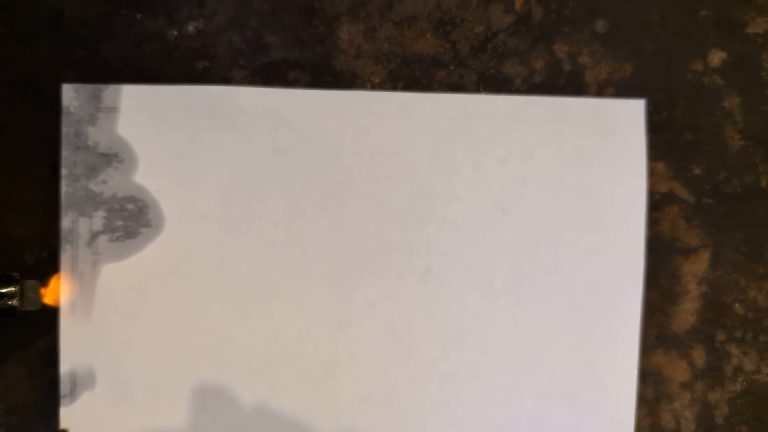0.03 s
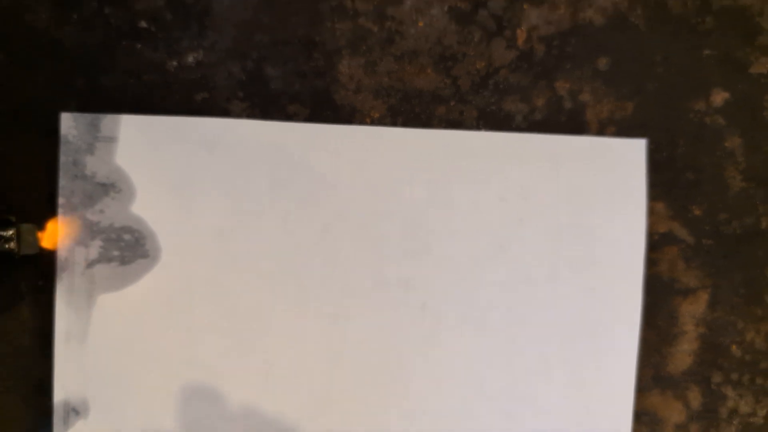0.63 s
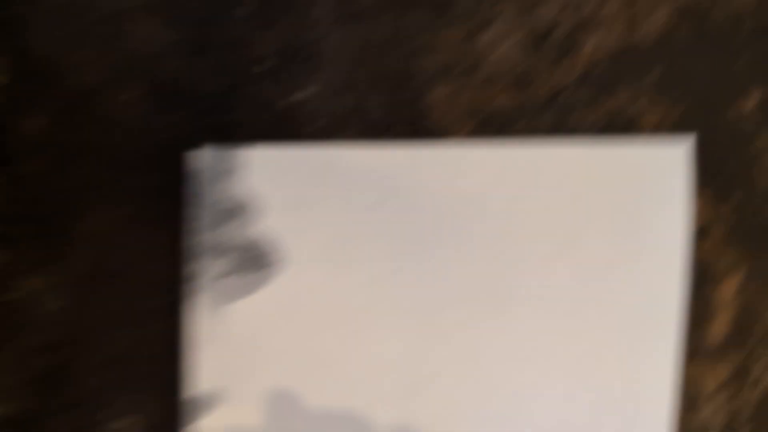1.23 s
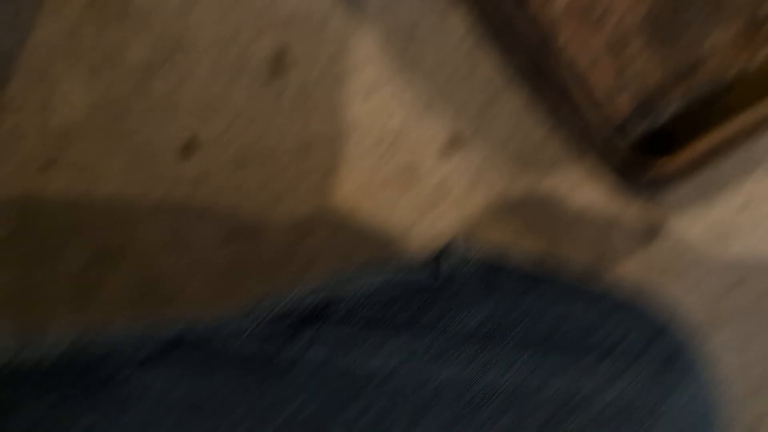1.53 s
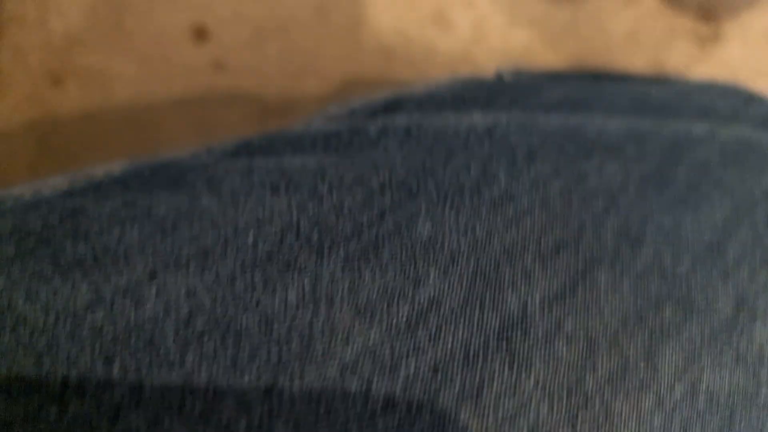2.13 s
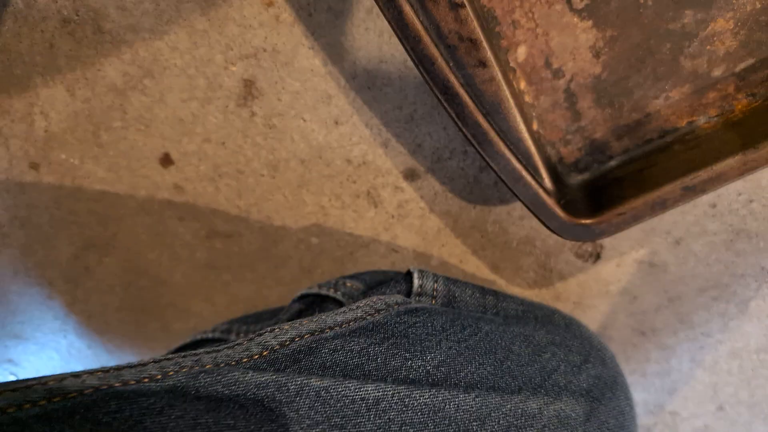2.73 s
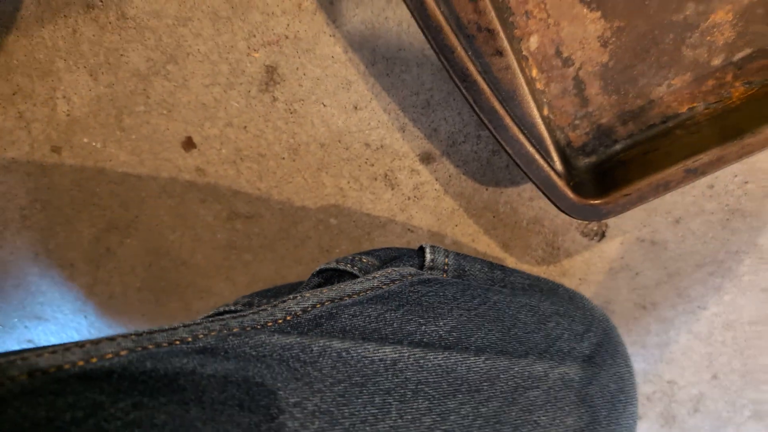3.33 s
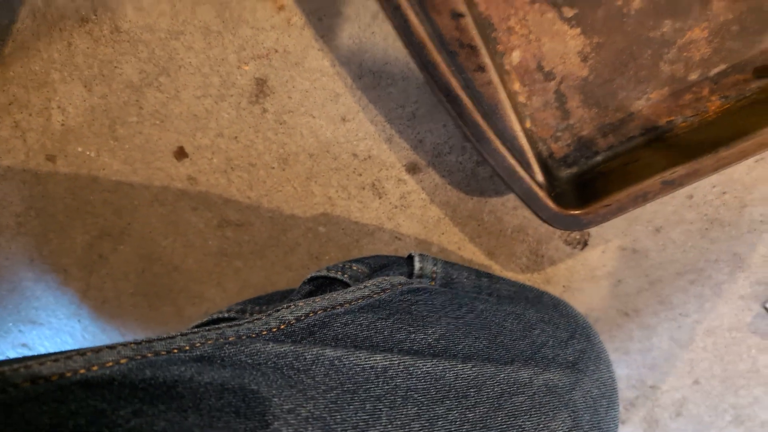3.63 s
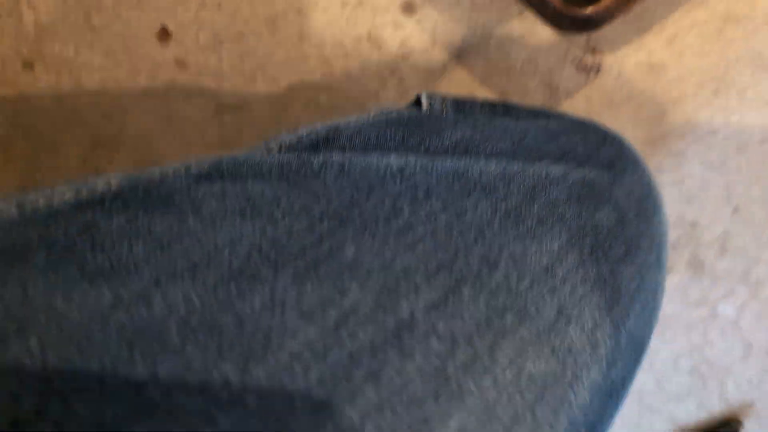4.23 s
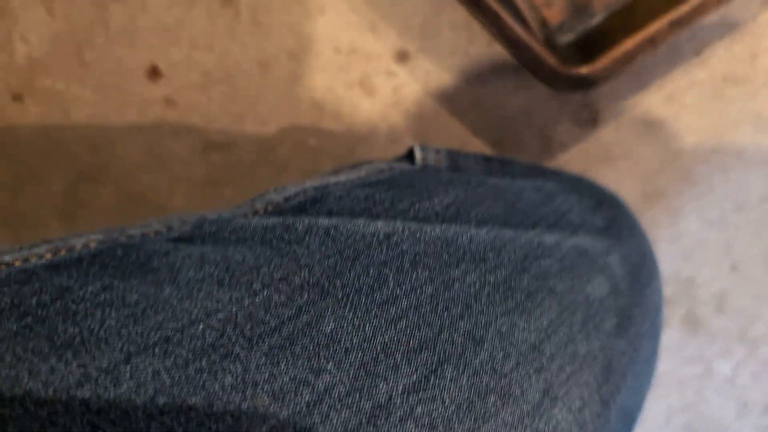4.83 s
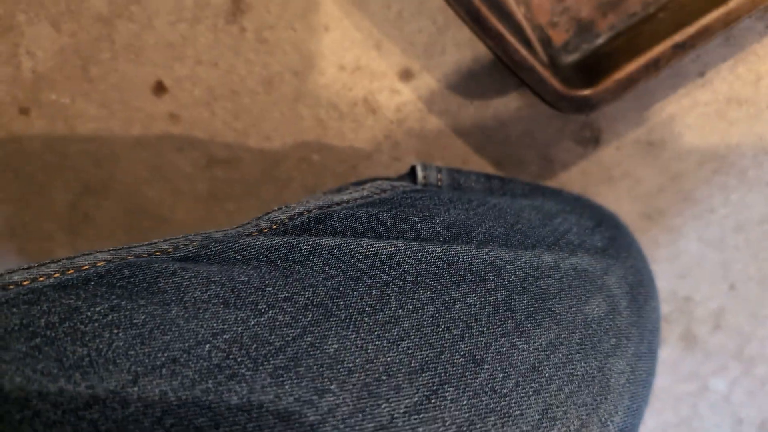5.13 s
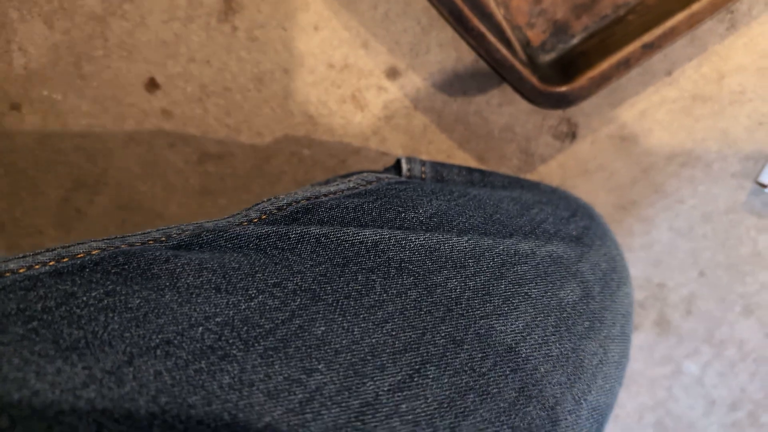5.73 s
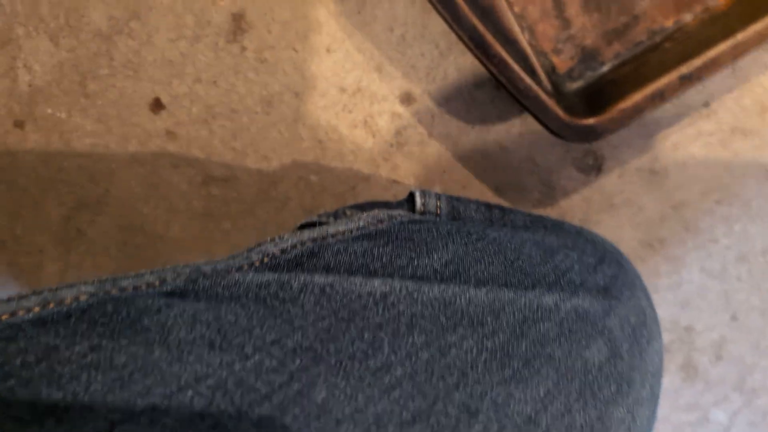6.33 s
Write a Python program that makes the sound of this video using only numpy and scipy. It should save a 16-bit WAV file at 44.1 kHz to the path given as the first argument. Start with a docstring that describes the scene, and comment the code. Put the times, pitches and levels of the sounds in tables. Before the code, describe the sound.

A lighter's flame rushes faintly against paper, then the lever snaps off with a sharp click. A sleeve swishes and the lighter clatters onto the floor. A metal baking tray is dragged over gritty concrete, scraping, catching and ringing lightly. Sharp snaps and dull finger knocks follow right on the microphone, with denim rustling against it and fading. A quiet low rumble fills the small, hard room.

```python
"""A metal baking tray is dragged over gritty concrete: it slips, catches and rings as sand grinds under it.
Before that, a lighter's flame rushes softly at the edge of a sheet of paper, the lever clicks off,
a sleeve swings past and the lighter clatters onto the floor. As the dragging ends, fingers knock and rub
on a hand-held camera and denim rustles against it. A low rumble fills the small, hard room."""
import sys
import numpy as np
from scipy import signal
from scipy.fft import rfft, irfft
from scipy.io import wavfile
from scipy.ndimage import uniform_filter1d

SR = 44100
rng = np.random.default_rng(int(sys.argv[2]) if len(sys.argv) > 2 else 0)


def to_wav(sig):
    """Store sig (one row per channel, or 1-D mono) as 16-bit WAV at the path in sys.argv[1].

    Samples outside -1..1 are clipped; the rate is SR.
    """
    pcm = np.clip(np.atleast_2d(sig), -1, 1) * 32767
    pcm = np.round(pcm).astype(np.int16)
    wavfile.write(sys.argv[1], SR, pcm.T)  # frames by channels


N = 290178
T = np.arange(N) / SR

# Pushes that slide the tray: start_s, length_s, level_db
PUSHES = [(2.565, 0.15, -34.5), (2.72, 0.048, -41), (2.785, 0.05, -30.5), (2.92, 0.13, -41.5),
          (2.99, 0.16, -35.5), (3.14, 0.089, -34), (3.40, 0.15, -47), (3.52, 0.1, -41.5), (3.63, 0.13, -45)]
# The tray catching on the floor: start_s, level_db, treble_db, fade_s, pan_db
# (a fade is the time to drop by 60 dB; a pan above zero is to the left)
CATCHES = [(2.568, -42, -12.5, 0.17, -3), (2.799, -26.5, 0.5, 0.093, 0), (2.82, -24, -8, 0.13, -3),
           (3.278, -28.5, -9, 0.058, -0.5), (3.406, -39.5, -17.5, 0.046, 6), (3.435, -36, -3.5, 0.092, -2)]
# Tone of the scrape, or how strong each pitch is: pitch_hz, level_db
SCRAPE_TONE = [(71, -59), (120, -25.5), (355, -13.5), (418, -23), (580, -8), (773, -8), (1090, -2.5),
               (1290, -7.5), (1400, -8), (2480, -16.5), (2700, -20), (3520, -14), (4590, -22),
               (7200, -28.5), (16000, -44.5)]
# Sand grinding under the rim: start_s, length_s, level_db, pitch_hz
GRINDS = [(2.622, 0.1, -43, 2900), (2.961, 0.067, -46, 2860), (3.12, 0.058, -38.5, 2690),
          (3.268, 0.023, -24.5, 2850), (3.301, 0.029, -25.5, 1860), (3.385, 0.084, -29.5, 1990),
          (3.49, 0.19, -42.5, 2066), (3.618, 0.06, -32.5, 3280)]
# Tone of the sand: pitch_hz, level_db
SAND_TONE = [(71, -48.5), (120, -21), (231, -8.5), (402, -17.5), (546, -8.5), (789, -8), (892, -19.5),
             (1120, -20.5), (1490, -17.5), (1980, -3.5), (2240, -5.5), (4880, -7.5), (6110, -10.5),
             (14700, -17.5), (16000, -27.5)]

def tray():
    """The tray slides and catches on concrete; sand under its rim makes it stick, slip and chatter."""
    slips = unit(friction(per_s=6500, spread_db=-0.5, flutter_db=1.8, lag_ms=-0.11, alike=0.4))
    slips = slips * strokes(PUSHES, rise_share=0.76, fade_s=0.31)
    scrape = unit(colour(slips, SCRAPE_TONE)) * slips.std()
    catches = blows(CATCHES, SCRAPE_TONE, lag_ms=-.5, alike=0.37, rise_ms=2.7, split_hz=2400, tick_db=-17)
    sand = friction(per_s=2800, spread_db=1, flutter_db=3, lag_ms=-0.47, alike=0.12)
    starts, _, _, pitches = np.transpose(GRINDS)
    chatter_hz = pitches[np.maximum(np.searchsorted(starts, T) - 1, 0)]  # each grind has its own pitch
    chatter = amp(-8.5) * unit(resonate(sand, chatter_hz, width_hz=600))
    rasp = (unit(colour(sand, SAND_TONE)) + chatter) * strokes(GRINDS, rise_share=0.66, fade_s=0.074)
    ring = tray_ring(slips + catches, fade_s=.4, ring_db=-2.3)
    return room(bounces(scrape + catches + rasp, echo_db=-1), echo_db=-9.5) + ring


# The notes the tray rings with: pitch_hz, level_db
TRAY_NOTES = [(565.2, -54), (602.9, -52), (656.8, -57), (732.1, -57), (791.3, -57), (855.9, -51),
              (936.7, -52), (1087, -45), (1206, -54), (1357, -49), (1475, -52), (1583, -56), (1669, -56),
              (1766, -55), (1916, -57), (2116, -59), (2159, -62), (2272, -62), (2336, -64), (2390, -59),
              (2487, -58), (2546, -59), (2853, -62), (3068, -61), (3418, -60), (3682, -64), (3779, -64),
              (4120, -61), (5350, -62), (6950, -67)]

def tray_ring(x, fade_s, ring_db):
    """Sheet metal rings on after each touch; its notes reach left and right a little out of step."""
    t = np.arange(SR // 2) / SR
    notes = sum(amp(db) * np.cos(2 * np.pi * (hz * t + .1 * rng.uniform(-0.82, 1, (2, 1))))
                for hz, db in TRAY_NOTES)
    ring = convolve(x, notes * amp(-60 * t / fade_s))
    return amp(ring_db) * unit(ring) * x.std()


# Clicks of the lighter's lever: start_s, level_db, treble_db, fade_s, pan_db, ring_hz, ring_db
CLICKS = [(0.9704, -60.5, -1, 0.0082, -10, 1720, 12), (0.9966, -52.5, 6, 0.011, -9, 1400, -11),
          (1.0263, -38.5, -6, 0.0056, -3, 1670, 6), (1.0321, -37.5, -15, 0.035, -13.5, 1880, 8.5),
          (1.0809, -13, 1.5, 0.018, -8.5, 1870, -9.5), (1.1464, -40.5, 12, 0.025, -3, 1850, -16),
          (1.1544, -26, -5.5, 0.02, -3.5, 1740, 5), (1.398, -52, -9, 0.013, -7, 1720, 5)]
# Tone of the lever: pitch_hz, level_db
CLICK_TONE = [(240, -84.5), (400, -56), (1060, -24.5), (1330, -25.5), (1510, -10.5), (1730, -7),
              (2360, -24), (2670, -15), (3120, -14.5), (3690, -8.5), (5190, -21.5), (7170, -12),
              (8630, -22.5), (13700, -22.5), (16000, -26)]
# The lighter landing and rocking: start_s, level_db, treble_db, fade_s, pan_db, ring_hz, ring_db
CLACKS = [(1.968, -38.5, -1, 0.089, 2.5, 1077, -10.5), (2.013, -19, -7, 0.033, 0, 777, -4.5),
          (2.027, -21.5, -16, 0.022, -0.5, 1560, 6.5), (2.092, -31, -2.5, 0.036, 13, 1490, -19.5),
          (2.104, -27, -9, 0.08, -3.5, 1066, 4.5)]
# Tone of the landing: pitch_hz, level_db
CLACK_TONE = [(120, -44), (200, -6.5), (491, -31.5), (836, -25.5), (1020, -13.5), (1120, -9.5),
              (1500, -7.5), (2250, -19), (3370, -15), (4350, -15), (6520, -15.5), (9930, -24.5),
              (12200, -15.5), (16000, -30)]

def lighter():
    """The lever springs back close by on the right; then the lighter is put on the floor."""
    lever = blows(CLICKS, CLICK_TONE, lag_ms=.43, alike=0.78, rise_ms=0.79, split_hz=2400, tick_db=-6.5)
    shell = lighter_ring(CLICKS, swell_ms=1.2, lag_ms=.45)
    landing = blows(CLACKS, CLACK_TONE, lag_ms=-.301, alike=.51, rise_ms=.63, split_hz=3160, tick_db=-38)
    landing += lighter_ring(CLACKS, swell_ms=1.8, lag_ms=-0.2)
    sound = room(lever, echo_db=-15.5) + shell + room(landing, echo_db=-6)
    return bass_cut(sound, hz=480)  # so small a thing gives off little bass


def lighter_ring(rows, swell_ms, lag_ms):
    """Each hit wakes one note in the lighter's shell, which swells and dies almost at once."""
    out, t = np.zeros((2, N)), np.arange(SR // 10) / SR
    age = t / (swell_ms / 1000)
    swell = age ** 2 * np.exp(2 - 2 * age)
    delay_s = np.array([[lag_ms / 1000], [0]])
    for start_s, db, _, _, pan_db, hz, ring_db in rows:
        note = swell * np.sin(2 * np.pi * hz * (t - delay_s))
        add(out, start_s, note * amp(db + ring_db) * panned(pan_db))
    return out


# Sharp snaps of the camera's case: start_s, level_db, treble_db, fade_s, pan_db
SNAPS = [(3.662, -28.5, -18.5, 0.029, -5.5), (3.677, -32, -13, 0.024, -1), (3.707, -12, -6.5, 0.029, 0),
         (3.717, -24, -5, 0.031, -13.5), (3.72, -13, -2, 0.02, 4.5), (3.792, -25.5, 5, 0.044, -1),
         (3.818, -39.5, -11.5, 0.019, 5.5), (4.214, -16, 14.5, 0.027, 3)]
# Tone of the snaps: pitch_hz, level_db
SNAP_TONE = [(120, -52.5), (200, -22.5), (709, -15.5), (1060, -22.5), (1770, -0.5), (2170, -8), (2860, 2),
             (3830, -0.5), (6170, 0.5), (10100, -7.5), (14300, -13), (16000, -24.5)]
# Dull fingertip knocks: start_s, level_db, treble_db, fade_s, pan_db
KNOCKS = [(3.944, -30.5, -15.5, 0.025, 9.5), (3.952, -31, -6.5, 0.046, 5.5),
          (3.959, -27.5, -18.5, 0.02, 13), (4.031, -27.5, 4.5, 0.05, 9), (4.061, -36.5, 14, 0.027, 2.5),
          (4.105, -40, -22, 0.074, 9), (4.116, -38.5, -18.5, 0.041, -4), (4.222, -26, -18.5, 0.046, -1.5),
          (4.469, -40.5, -10, 0.05, 6), (4.611, -39, -27, 0.088, 0.5), (6.135, -39, -31, 0.06, -2)]
# Tone of the knocks: pitch_hz, level_db
KNOCK_TONE = [(35, -62.5), (60, 3.5), (250, 0.5), (621, -9), (862, -2.5), (2140, 4), (2650, -1.5),
              (3040, 1.5), (3850, -17), (4420, -3.5), (5720, -24.5), (8510, -21), (10300, -27),
              (14900, -33.5), (16000, -27)]
# The hand shifting its grip: start_s, length_s, level_db
GRIP_SHIFTS = [(3.41, 0.059, -41.5), (3.61, 0.078, -46), (3.715, 0.031, -35.5), (3.925, 0.027, -32.5),
               (4.02, 0.029, -46), (4.10, 0.018, -45.5), (4.205, 0.017, -41.5), (4.37, 0.15, -49),
               (4.58, 0.05, -60), (4.69, 0.14, -74.5), (5.05, 0.055, -61), (5.14, 0.22, -71),
               (6.125, 0.042, -54), (6.18, 0.15, -62.5), (6.345, 0.049, -63.5)]
# Tone of the rubbing hand: pitch_hz, level_db
GRIP_TONE = [(41, -32), (70, 3), (256, 4.5), (411, -5), (449, -12.5), (566, 4), (887, -4.5), (1180, 1.5),
             (1500, -4.5), (1950, -44), (3300, -120)]

def fingers():
    """Fingers send snaps, knocks and a low rubbing through the camera's case."""
    snaps = blows(SNAPS, SNAP_TONE, lag_ms=-.4, alike=0.24, rise_ms=0.63, split_hz=3700, tick_db=-15)
    knocks = blows(KNOCKS, KNOCK_TONE, lag_ms=-.48, alike=0.84, rise_ms=1.8, split_hz=5100, tick_db=-8.5)
    skin = friction(per_s=3100, spread_db=5.5, flutter_db=4, lag_ms=-0.51, alike=0.89)
    grip = unit(colour(skin, GRIP_TONE)) * strokes(GRIP_SHIFTS, rise_share=0.66, fade_s=0.22)
    return room(snaps + knocks, echo_db=-11.5) + grip


# Strokes of denim and skin near the camera: start_s, length_s, body_db, treble_db
DENIM_STROKES = [(3.73, 0.12, -44, -45), (3.86, 0.082, -42.5, -43), (3.99, 0.098, -46, -43.5),
                 (4.12, 0.17, -53, -47), (4.31, 0.099, -49, -47), (4.37, 0.23, -50, -51),
                 (4.68, 0.082, -51, -51), (4.78, 0.069, -69.5, -74.5), (4.90, 0.093, -72, -76),
                 (5.005, 0.099, -59.5, -60.5), (5.135, 0.14, -58, -56), (5.25, 0.14, -63, -64),
                 (5.39, 0.07, -60, -64.5), (5.52, 0.14, -75.5, -77), (5.82, 0.18, -87.5, -84.5),
                 (6.01, 0.05, -79.5, -74), (6.15, 0.14, -64, -54.5), (6.22, 0.062, -55, -54),
                 (6.31, 0.18, -72.5, -77.5), (6.48, 0.1, -77.5, -85)]
# Tone of the denim: pitch_hz, level_db
DENIM_TONE = [(180, -33.5), (300, -7.5), (486, -11.5), (645, -9.5), (930, -14.5), (1510, -2.5), (1660, -2),
              (2320, 0.5), (2880, -6.5), (4300, -1), (5160, -7), (6200, -3.5), (9880, -14), (13300, -11.5),
              (16000, -19)]
# Notes of the camera's case: pitch_hz, width_hz (widened to at least 150), level_db
CASE_NOTES = [(2291, 42, -3), (3300, 530, 3), (4330, 300, -1.5), (6040, 170, -3), (8500, 130, -9.5)]

def denim():
    """The weave rubs close by and rings the camera's case; harder strokes fizz more."""
    weave = friction(per_s=5000, spread_db=1.5, flutter_db=1.5, lag_ms=-.45, alike=0.32)
    case = sum(amp(db) * signal.lfilter(*signal.iirpeak(hz, hz / max(width_hz, 150), fs=SR), weave)
               for hz, width_hz, db in CASE_NOTES)
    rasp_hz = 2100 * np.exp(.14 * drift(size=3000))  # a raspy band whose pitch wanders
    rasp = amp(-11) * unit(resonate(weave, rasp_hz, width_hz=300))
    rub = unit(colour(bounces(weave, echo_db=2), DENIM_TONE))
    body, treble = split(rub + amp(-7.5) * unit(case) + rasp, hz=4100)
    body_gain, treble_gain = (strokes(DENIM_STROKES, rise_share=0.51, fade_s=0.26, column=column)
                              for column in (2, 3))
    hiss, fizz = split(unit(treble), hz=9000)
    fizz_gain = (treble_gain / amp(-51.5)) ** 0.71
    return unit(body) * body_gain + (hiss + fizz * fizz_gain) * treble_gain


# Loudness of the flame: time_s, body_db, treble_db
FLAME_LEVELS = [(0.0, -64, -76), (0.35, -66.5, -76.5), (0.66, -63.5, -85), (0.82, -64.5, -80),
                (1.02, -67.5, -71), (1.08, -69.5, -53)]
# Tone of the flame: pitch_hz, level_db
FLAME_TONE = [(120, -40.5), (200, 2), (262, -9.5), (344, -1), (734, -3.5), (1050, -1.5), (1570, -21),
              (1720, -16.5), (2090, -32), (3120, -34.5), (15000, -56)]
# The lighter's tip brushing the paper: start_s, level_db, treble_db, fade_s, pan_db
BRUSHES = [(0.503, -54, -17.5, 0.44, 0), (0.612, -47.5, -21, 0.46, -3.5), (0.641, -53.5, -15, 0.13, -6.5),
           (0.675, -52, -38, 0.04, 7.5)]
# Tone of the paper: pitch_hz, level_db
PAPER_TONE = [(120, -40.5), (200, -18), (636, -11), (708, -25), (864, 4.5), (980, -17.5), (1690, -16.5),
              (2420, -30.5), (4160, -33), (15000, -70.5)]

def flame():
    """The flame rushes softly; the lighter brushes the paper and the tray under it rings faintly."""
    swirls = friction(per_s=40000, spread_db=1, flutter_db=1.5, lag_ms=.09, alike=0.28)
    body, treble = split(colour(swirls, FLAME_TONE), hz=1800)
    rush = unit(body) * level(FLAME_LEVELS) + unit(treble) * level(FLAME_LEVELS, column=2)
    brushes = blows(BRUSHES, PAPER_TONE, lag_ms=0.46, alike=0.12, rise_ms=6, split_hz=2530, tick_db=-24)
    return panned(-3) * rush + brushes + tray_ring(brushes, fade_s=.35, ring_db=-4)


# The sleeve as the arm swings away: time_s, level_db, treble_db (added to the level)
SLEEVE_LEVELS = [(1.17, -56, -5), (1.25, -67.5, -10), (1.33, -59.5, -17), (1.45, -64, -8),
                 (1.63, -59.5, -14.5), (1.77, -84.5, -15), (1.86, -94.5, -12.5)]
# Tone of the sleeve: pitch_hz, level_db
SLEEVE_TONE = [(120, -32.5), (200, -5.5), (394, -8), (806, -1.5), (1210, -4), (1560, -1.5), (3130, -12.5),
               (6400, -17.5), (8740, -28), (14600, -29.5), (16000, -35)]
# A scuff as the hand lets go of the lighter: time_s, level_db, treble_db (added to the level)
SCUFF_LEVELS = [(2.2, -59, -13), (2.236, -49.5, -9), (2.262, -55.5, 5.5), (2.304, -64, -15),
                (2.43, -78.5, -4), (2.56, -77, -11)]
# Tone of the scuff: pitch_hz, level_db
SCUFF_TONE = [(590, -49), (1000, -1.5), (1520, 1.5), (3120, -7), (3710, -1), (4960, -10.5), (7100, -10),
              (16000, -37)]

def sleeve():
    """A sleeve swings past on the right and scuffs by the floor."""
    slips = friction(per_s=4300, spread_db=1, flutter_db=0, lag_ms=0.472, alike=0.14)
    swing = panned(-4.5) * rustle(SLEEVE_LEVELS, SLEEVE_TONE, slips, split_hz=6100)
    return swing + rustle(SCUFF_LEVELS, SCUFF_TONE, slips, split_hz=4900)


# Tone of the room's rumble: pitch_hz, level_db
RUMBLE_TONE = [(20, -32), (33, -26.5), (45, -15.5), (66, 1), (85, -6.5), (115, -17.5), (170, -25),
               (300, -38), (600, -72)]
# Tone of the faint hiss of air: pitch_hz, level_db
AIR_TONE = [(180, -32), (300, 1), (994, -12.5), (1120, -11), (2070, -5.5), (3580, -17.5), (3950, -9),
            (4670, -6), (16000, -28.5)]

def background():
    """A low rumble with a wavering hum in it swells gently over faint air noise."""
    rumble = unit(colour(two_mics(rng.standard_normal((2, N)), lag_ms=0, alike=0.88), RUMBLE_TONE))
    hum_hz = 65.3 + 3.5 * drift(size=6000)
    hum = unit(np.sin(2 * np.pi * np.cumsum(hum_hz) / SR))
    air = unit(colour(two_mics(rng.standard_normal((2, N)), lag_ms=0, alike=.4), AIR_TONE))
    swell = amp(0.5 * drift(size=9000))
    return swell * (amp(-61) * rumble + amp(-65.5) * hum) + amp(-87.5) * air


# How long the room echoes: pitch_hz, fade_s
ROOM_FADES = [(150, 0.71), (1200, 0.33), (4000, 0.27), (14000, 0.16)]

def room(x, echo_db):
    """Many echoes come off the floor and walls; the treble dies first."""
    echoes = rng.standard_normal((2, SR // 2)) * (rng.random((2, SR // 2)) < .1)
    echoes[:, :SR // 200] = 0  # none in the first 5 ms
    hz, t, bands = signal.stft(echoes, SR, nperseg=256)
    fade = amp(-60 * t / at_pitch(ROOM_FADES, hz)[:, None])
    tail = signal.istft(bands * fade, SR, nperseg=256)[1]
    return x + amp(echo_db) * convolve(x, tail / np.linalg.norm(tail[0]))


def bounces(x, echo_db, count=16):
    """Floor, knee and hand send back quick echoes that boost some pitches and cancel others."""
    echoes = np.zeros((2, SR // 80))
    delays = rng.integers(SR // 600, SR // 80, (2, count))
    gains = rng.choice([-1., 1.], delays.shape) * amp(echo_db) / np.sqrt(count)
    np.put_along_axis(echoes, delays, gains, axis=1)
    echoes[:, 0] = 1  # the direct sound
    return convolve(x, echoes / np.linalg.norm(echoes[0]))


def friction(per_s, spread_db, flutter_db, lag_ms, alike):
    """Rubbing is many tiny slips of uneven size that come in clumps."""
    sizes = amp(spread_db * np.minimum(rng.exponential(1, N), 4))
    slipping = rng.random(N) < per_s / SR
    clumps = unit(uniform_filter1d(drift(size=300), size=200))
    slips = rng.standard_normal((2, N)) * sizes * slipping
    return two_mics(slips * amp(flutter_db * clumps), lag_ms, alike)


def rustle(rows, tone, slips, split_hz):
    """Rubbing noise whose treble rises and falls with the speed of the stroke."""
    body, treble = split(colour(slips, tone), split_hz)
    return level(rows) * (unit(body) + unit(treble) * level(rows, column=2))


def blows(rows, tone, lag_ms, alike, rise_ms, split_hz, tick_db):
    """Each hit is a tick and a burst of noise in the struck thing's tone, with its own share of treble."""
    out, t = np.zeros((2, N)), np.arange(SR // 3) / SR
    for start_s, db, treble_db, fade_s, pan_db, *_ in rows:
        shape = amp(-60 * t / fade_s) * (1 - np.exp(-t / (rise_ms / 1000)))
        burst = rng.choice([-1., 1.], (2, len(t))) * shape / shape.max()
        strength = burst.std()
        burst[0, SR // 1000] += amp(tick_db) * np.linalg.norm(burst[0])  # the tick, 1 ms in
        body, treble = split(colour(two_mics(burst, lag_ms, alike), tone), split_hz)
        hit = strength * unit(unit(body) + amp(treble_db) * unit(treble))
        add(out, start_s, hit * amp(db) * panned(pan_db))
    return out


def strokes(rows, rise_share, fade_s, column=2):
    """Loudness of rubbing moves: each builds for a share of its length, holds, then dies away."""
    power = np.zeros(N)
    for row in rows:
        age_s, length_s = T - row[0], row[1]
        rise = np.sin(np.pi / 2 * np.clip(age_s / (length_s * rise_share), 0, 1)) ** 2
        fade = amp(-60 * np.maximum(age_s - length_s, 0) / fade_s)
        power += (amp(row[column]) * rise * fade) ** 2
    return np.sqrt(power)


def two_mics(pair, lag_ms, alike):
    """Two microphones share part of a sound; the left one hears it lag_ms later (earlier if negative)."""
    right = alike * pair[0] + np.sqrt(1 - alike ** 2) * pair[1]
    delay_s = np.maximum([[lag_ms], [-lag_ms]], 0) / 1000
    hz = np.fft.rfftfreq(len(right), 1 / SR)
    return irfft(rfft([pair[0], right]) * np.exp(-2j * np.pi * hz * delay_s), len(right))


def centre_bass(x, hz):
    """Low notes have long waves, which reach both microphones alike."""
    side = signal.sosfiltfilt(signal.butter(1, hz, "high", fs=SR, output="sos"), (x[0] - x[1]) / 2)
    return x.mean(0) + np.array([side, -side])


def panned(pan_db):
    """Left and right gains, pan_db apart."""
    return amp(np.array([[pan_db], [-pan_db]]) / 2)


def colour(x, tone, size=4096):
    """Gives a sound a tone, with a filter that rings only after each hit."""
    hz = abs(np.fft.fftfreq(size, 1 / SR))
    log_gain = np.log(amp(np.maximum(at_pitch(tone, hz), -100)))
    response = np.fft.ifft(np.exp(np.conj(signal.hilbert(log_gain)))).real
    return convolve(x, response[:size // 2])


def resonate(x, hz, width_hz):
    """Keeps a band around a moving pitch: shift it down to zero, smooth twice, shift back."""
    turn = np.exp(2j * np.pi * np.cumsum(hz) / SR)
    decay = np.exp(-np.pi * width_hz / SR)
    return (turn * signal.lfilter([(1 - decay) ** 2], [1, -2 * decay, decay ** 2], x / turn)).real


def split(x, hz):
    """The body below a pitch and the treble above it."""
    return [signal.sosfilt(signal.butter(2, hz, kind, fs=SR, output="sos").repeat(2, 0), x)
            for kind in ("low", "high")]


def bass_cut(x, hz):
    """Steeply turns down everything below a pitch."""
    return signal.sosfilt(signal.butter(4, hz, "high", fs=SR, output="sos"), x)


def convolve(x, response):
    """Filters each channel and keeps the length."""
    return signal.fftconvolve(np.atleast_2d(x), np.atleast_2d(response), axes=1)[:, :x.shape[-1]]


def at_pitch(rows, hz):
    """Looks up a pitch in a table, gliding between rows octave by octave."""
    pitches, values = np.transpose(rows)
    return np.interp(np.log(hz + 1), np.log(pitches + 1), values)


def level(rows, column=1):
    """Gain over time from a dB column; silent outside the rows."""
    rows = np.asarray(rows)
    return amp(np.interp(T, rows[:, 0], rows[:, column], left=-150, right=-150))


def drift(size):
    """A slow random wander, smoothed over size samples."""
    return unit(uniform_filter1d(rng.standard_normal(N), size=size))


def add(mix, start_s, sound):
    """Mixes in a two-channel sound."""
    part = mix[:, int(start_s * SR):][:, :sound.shape[1]]
    part += sound[:, :part.shape[1]]


def amp(db):
    """Decibels to gain."""
    return 10 ** (np.asarray(db) / 20)


def unit(x):
    """Scales to an average strength (rms) of one."""
    return x / np.sqrt(np.mean(x ** 2) + 1e-30)


def scene():
    """All the sounds together at the two microphones."""
    nearby = flame() + lighter() + tray() + sleeve() + denim() + fingers()
    return centre_bass(nearby, hz=194.6) + background()


def record(dry):
    """The recorder flattens any peak that is too loud and cuts the deepest bass and highest treble."""
    limited = np.clip(dry, -.85, .85)
    thin = bass_cut(limited, hz=35.5)
    treble_cut = signal.firwin(401, 16200, window=("kaiser", 9), fs=SR)
    return signal.oaconvolve(thin, treble_cut[None], "same")


dry = scene()
out = record(dry)
to_wav(out)
```